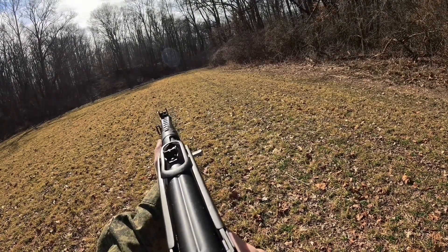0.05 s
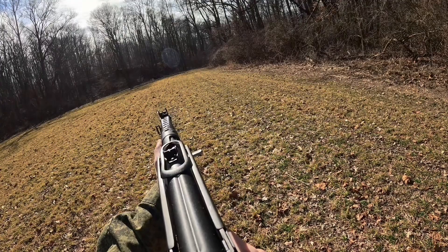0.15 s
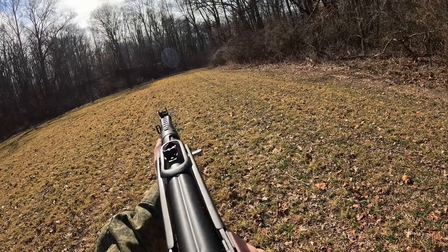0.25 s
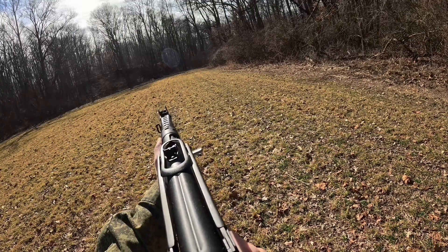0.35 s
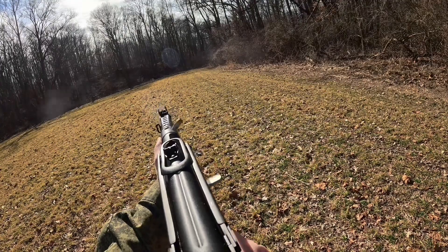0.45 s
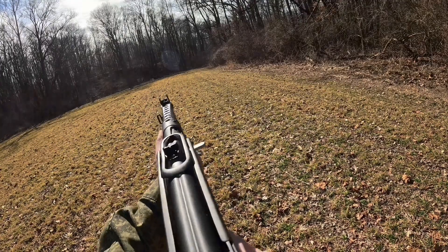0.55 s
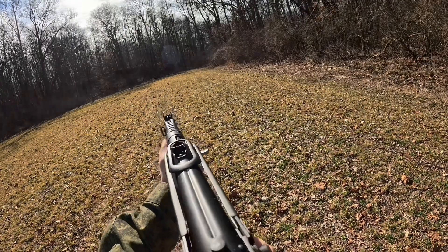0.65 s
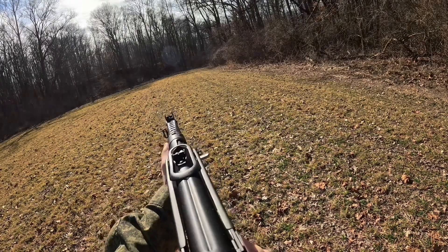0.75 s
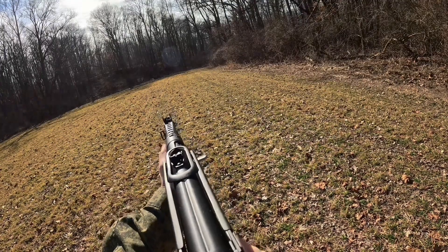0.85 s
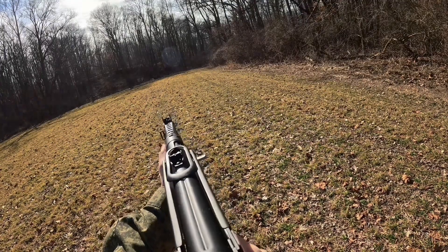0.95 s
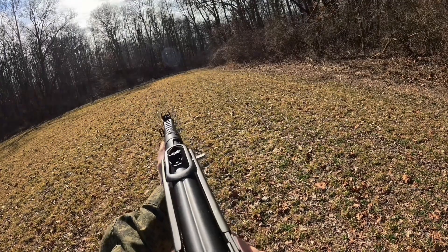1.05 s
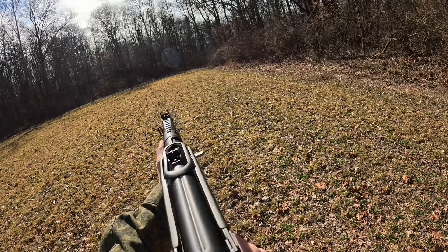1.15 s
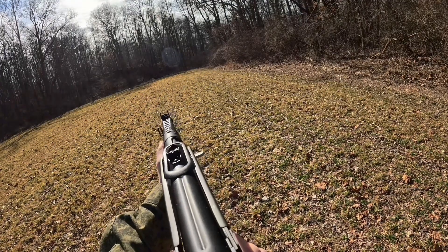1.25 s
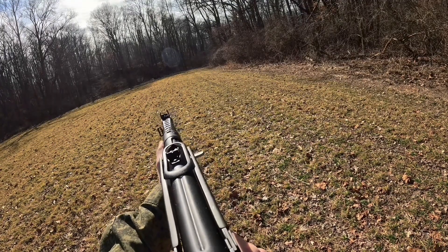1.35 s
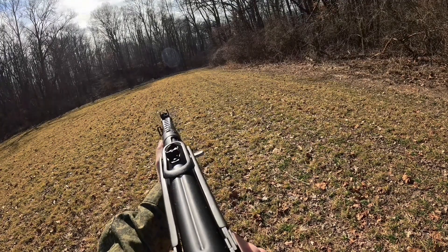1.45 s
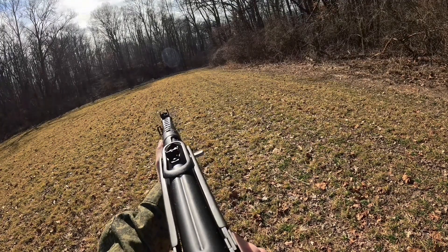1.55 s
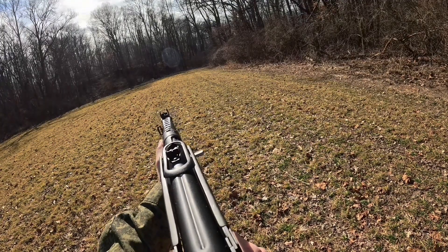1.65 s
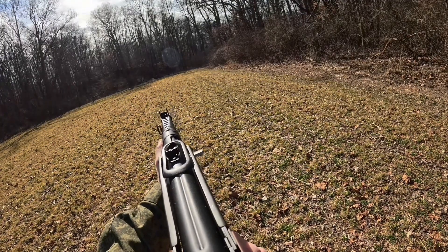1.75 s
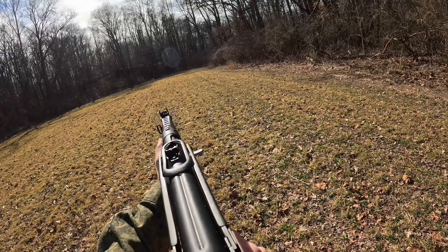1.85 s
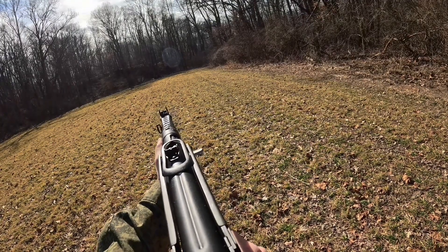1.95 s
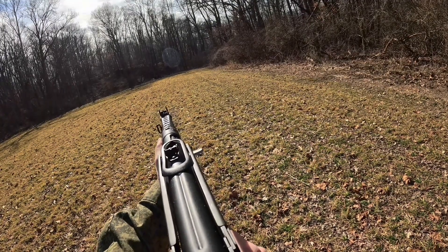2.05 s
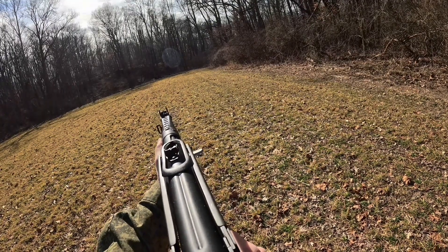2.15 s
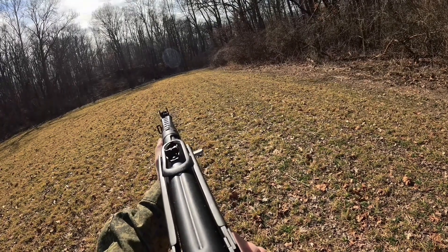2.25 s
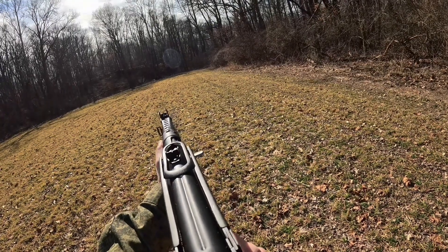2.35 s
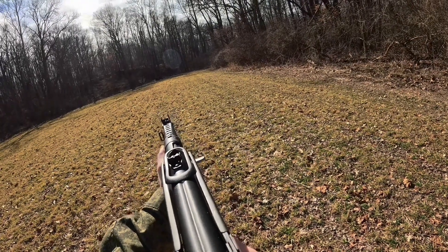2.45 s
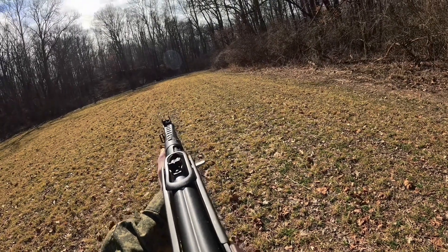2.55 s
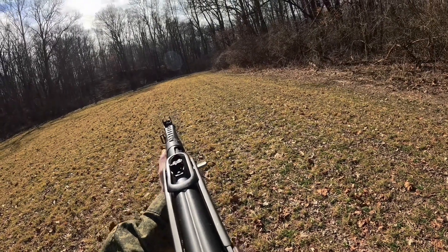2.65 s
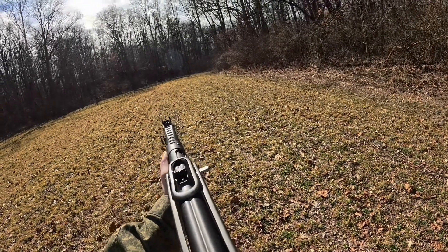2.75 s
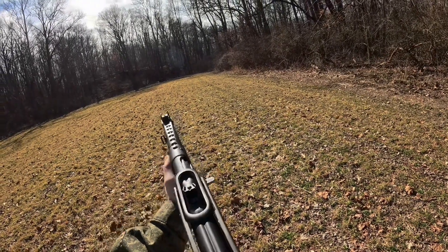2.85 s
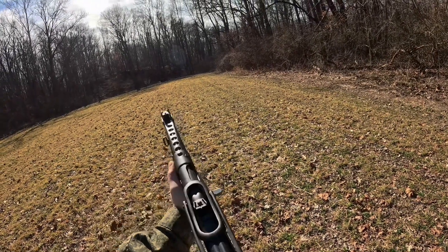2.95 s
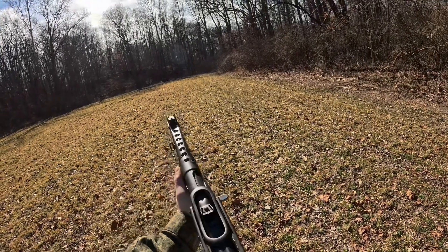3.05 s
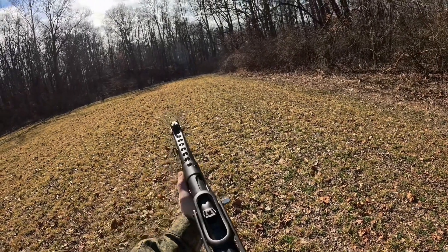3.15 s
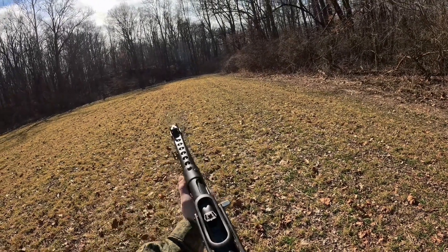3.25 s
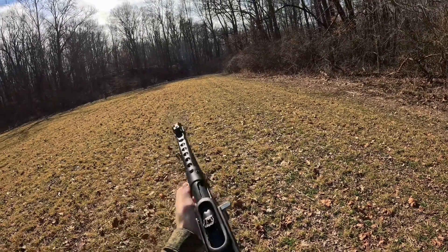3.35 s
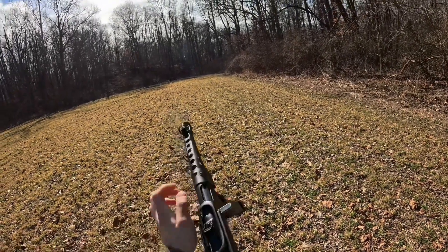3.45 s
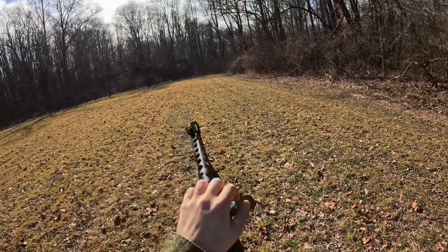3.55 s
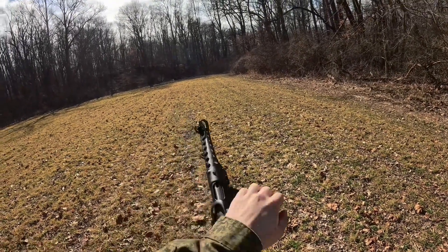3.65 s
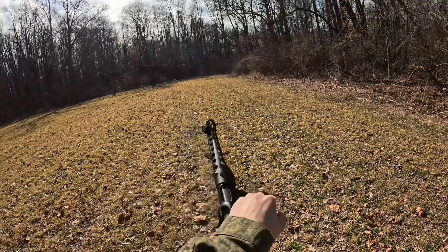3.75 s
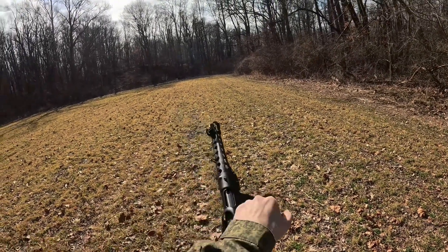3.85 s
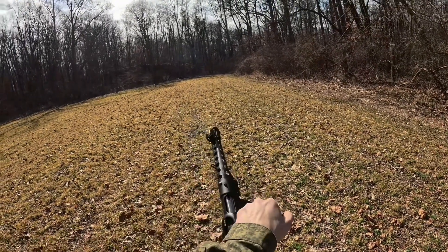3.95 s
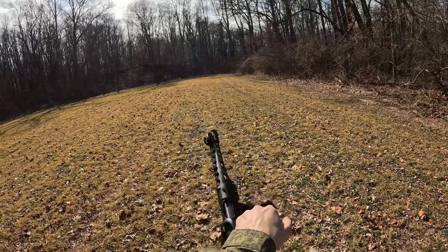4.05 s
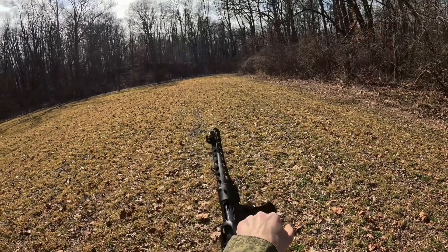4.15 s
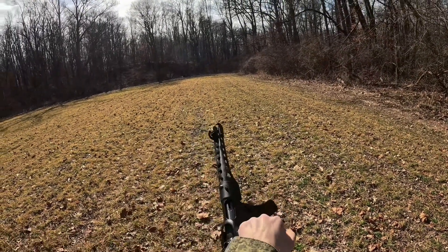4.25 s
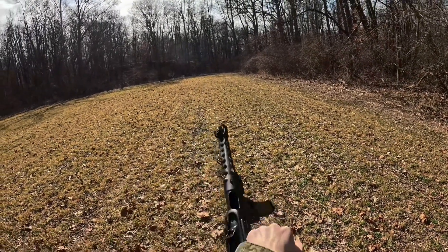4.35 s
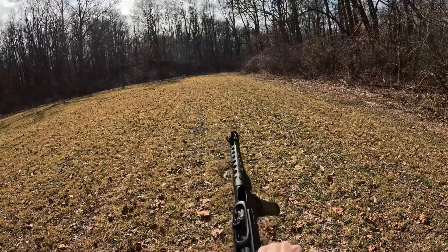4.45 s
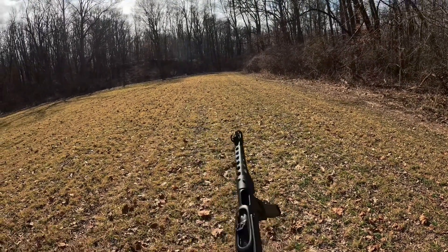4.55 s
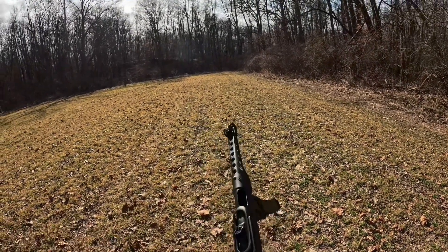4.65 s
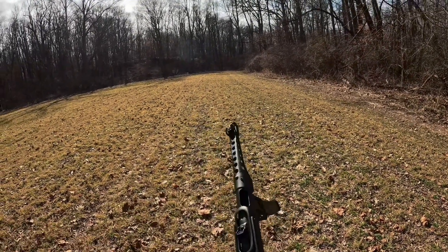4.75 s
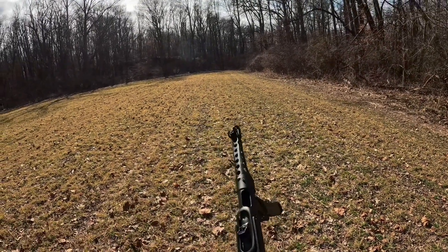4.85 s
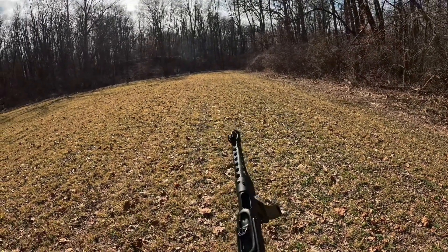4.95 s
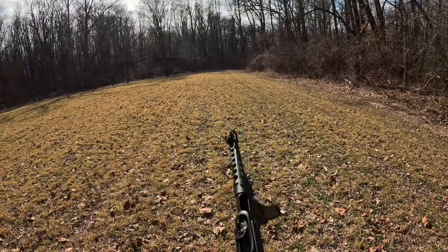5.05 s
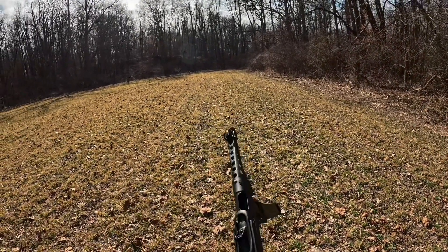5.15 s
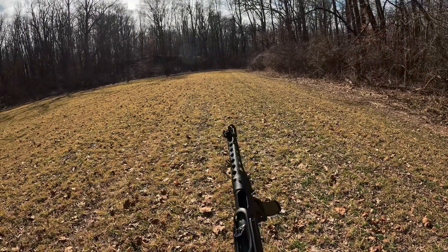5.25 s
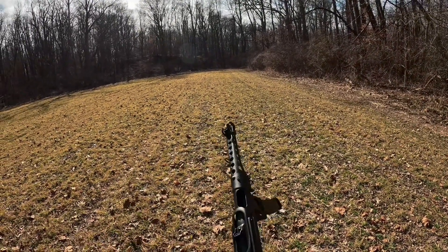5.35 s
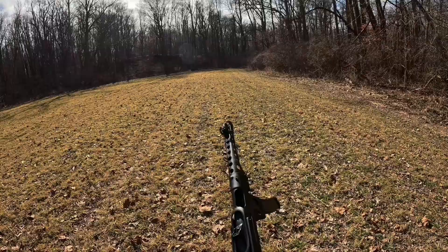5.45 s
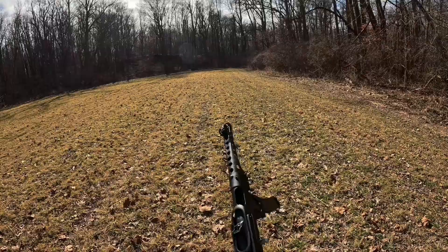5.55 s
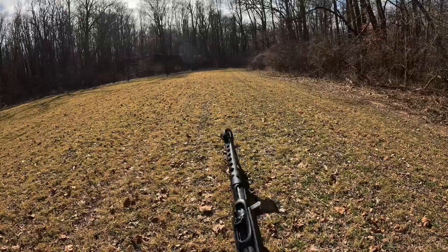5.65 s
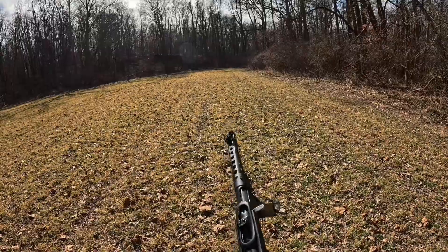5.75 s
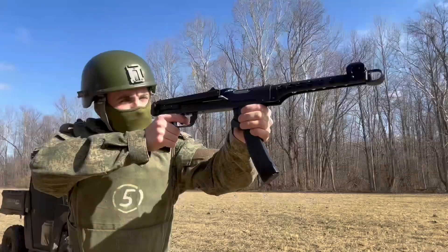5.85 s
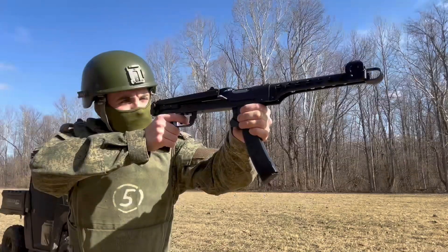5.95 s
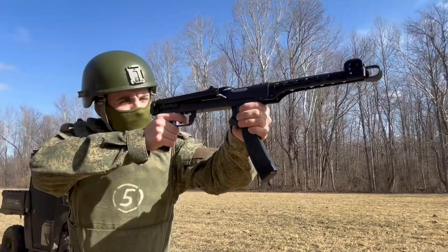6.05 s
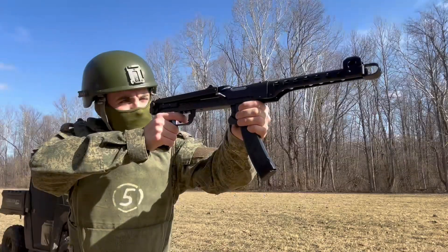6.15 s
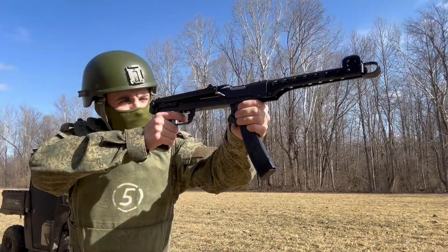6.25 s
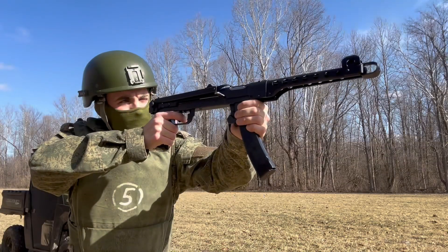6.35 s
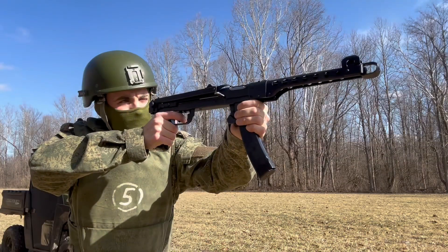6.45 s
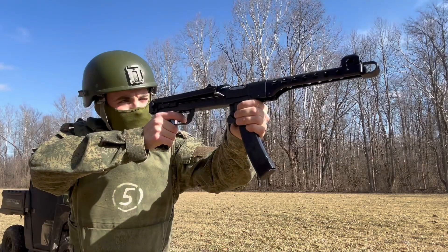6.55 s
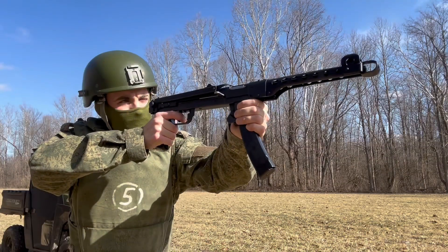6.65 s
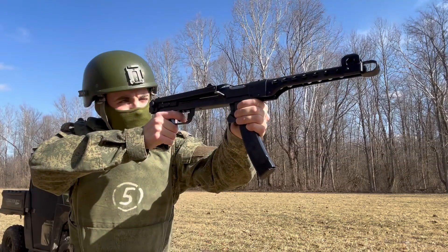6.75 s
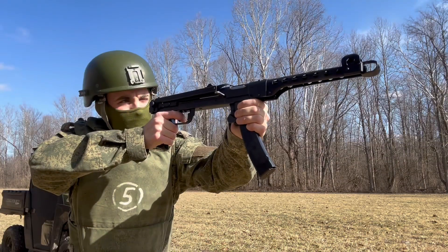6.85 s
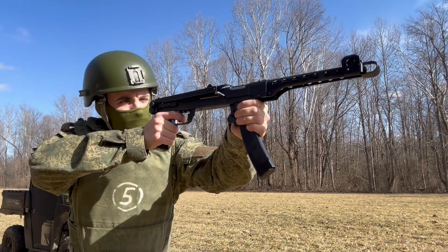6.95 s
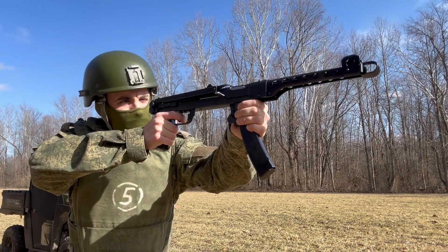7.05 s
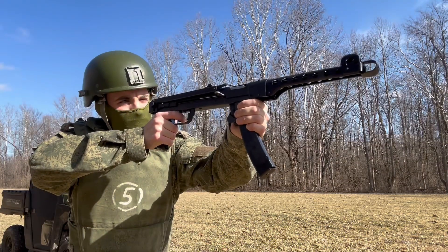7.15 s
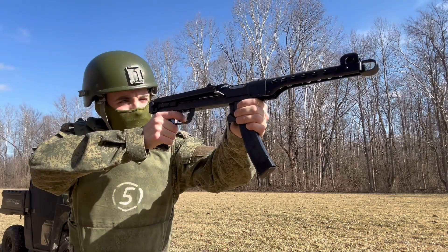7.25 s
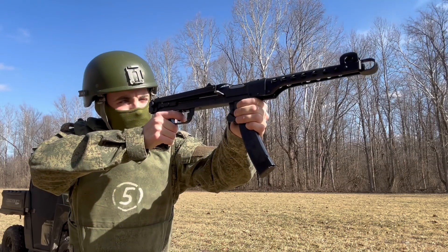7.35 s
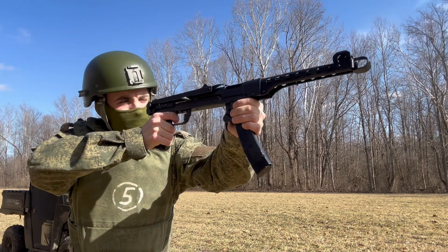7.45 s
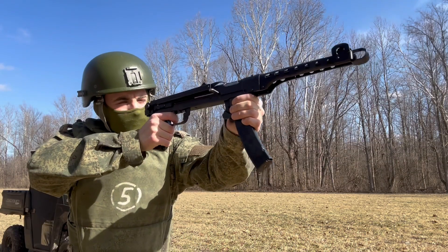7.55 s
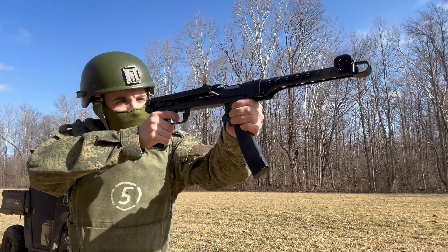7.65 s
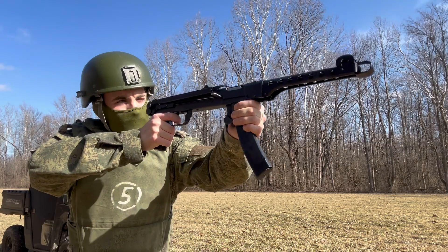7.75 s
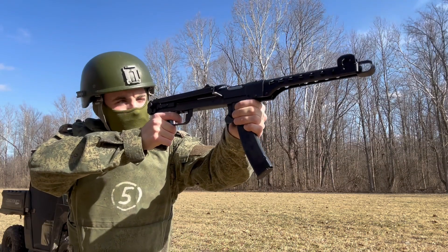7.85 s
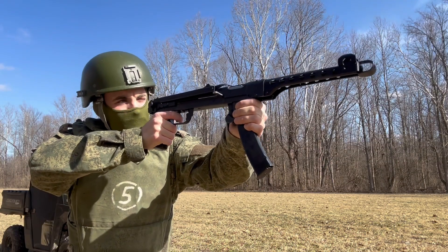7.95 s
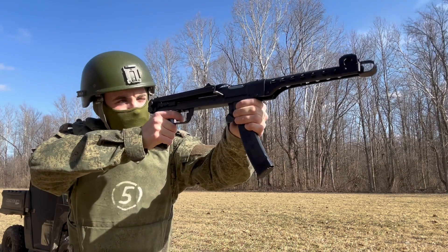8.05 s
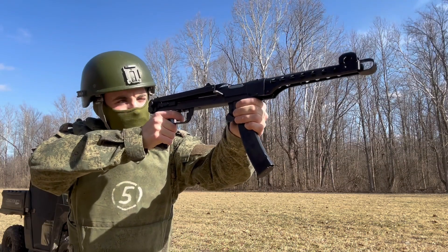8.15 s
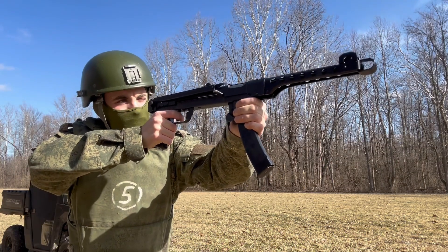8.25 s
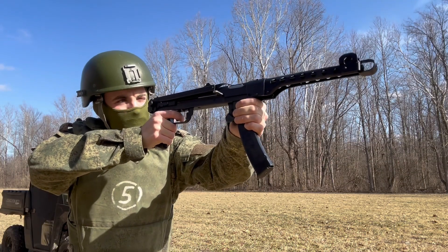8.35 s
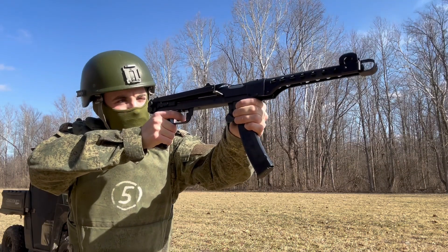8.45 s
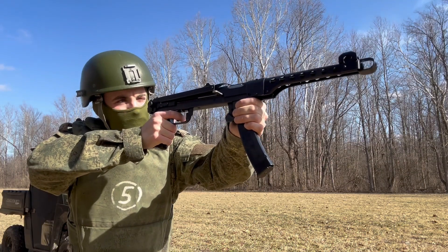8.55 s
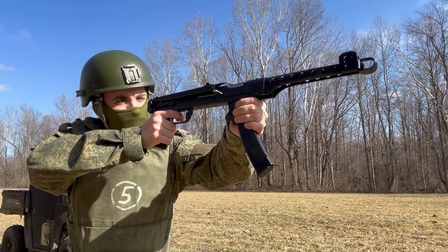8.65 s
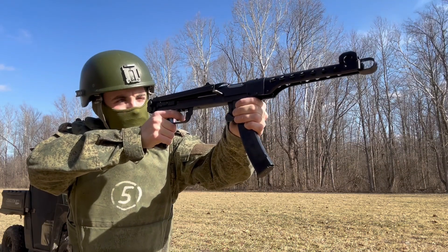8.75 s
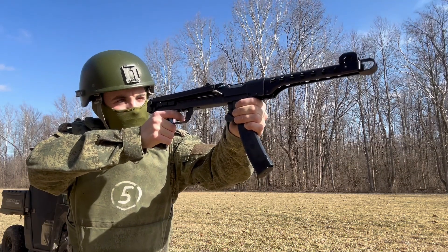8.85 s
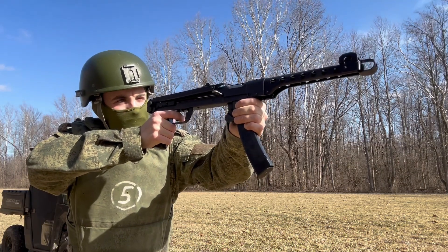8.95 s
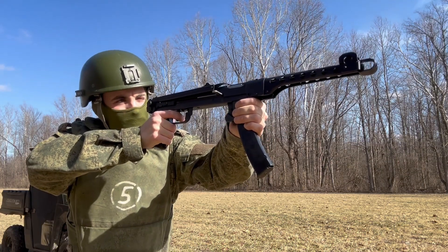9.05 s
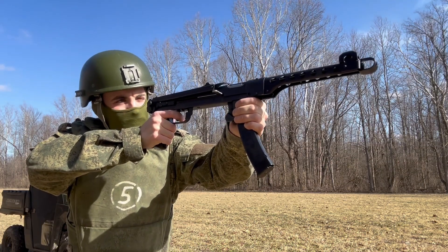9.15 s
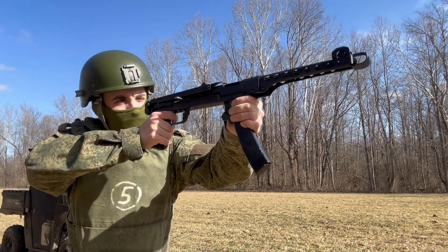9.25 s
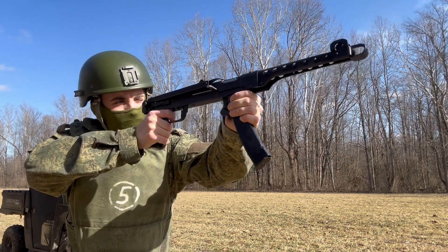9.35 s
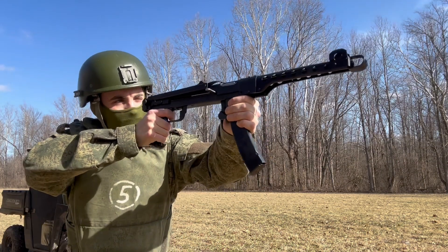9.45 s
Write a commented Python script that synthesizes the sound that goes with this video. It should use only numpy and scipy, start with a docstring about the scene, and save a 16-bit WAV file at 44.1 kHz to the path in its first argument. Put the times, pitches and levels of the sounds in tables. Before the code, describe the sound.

Three single submachine gun shots echo through woods, with metallic trigger clicks, a bolt pulled and released, and light wind.

```python
"""Gunshots in a wooded field

Single shots of a submachine gun are heard at the shooter's head (mono), then from a wide stereo pair
at his side. A short, clanging rush of noise swells just before each crack and boom; bare woods scatter
the report back. Trigger and bolt excite the steel receiver by impact and the rails by friction.
Cloth rustles, wind buffets the microphones and a far bird calls."""
import sys
import numpy as np
from scipy import signal
from scipy.fft import rfft, irfft, next_fast_len
from scipy.io import wavfile
from scipy.ndimage import uniform_filter1d, map_coordinates

SR = 44100
rng = np.random.default_rng(int(sys.argv[2]) if len(sys.argv) > 2 else 0)


def transcribe(signal):
    """Save signal, clipped to [-1, 1], as a 16-bit WAV file at the path in sys.argv[1]."""
    frames = np.atleast_2d(signal).T
    limited = np.clip(frames, -1, 1)
    pcm = np.round(limited * 32767).astype(np.int16)
    wavfile.write(sys.argv[1], SR, pcm)


N = 419371
MOVE_S = 5.828  # the listening place moves from HEAD to SIDE

# (crack time [s], rush length [s], rush exponent, rush [dB], crack [dB], boom [dB], boom pitch [Hz],
#  near echo [dB], near echo t60 [s], woods echo [dB])
SHOTS = [(0.54, .041, 1.12, -13, -14, -12.5, 161.2, -21, 0.21, 0),
         (7.4055, .019, 0.3, -16.5, -10, -27, 235.5, -24.5, 0.47, 0),
         (9.2, 0.023, 1.5, -14.5, -8, -17.5, 248.2, -22, 0.31, 3)]
# spectra of the rush, near echo, woods echo and low roll: (frequency [Hz], density [dB])
RUSH_HEAD = [(180, -38), (300, -6), (397, -16), (835, -6), (1090, -24), (1350, -4), (1780, -7.5),
             (2650, -9), (4210, -18), (5760, -16), (6680, -27.5), (10100, -29.5), (15500, -63.5)]
RUSH_SIDE = [(180, -31), (300, -1.5), (620, 7.5), (1120, -23), (1490, -8), (2480, 4), (2930, -8.5),
             (3510, -2.5), (4000, -4.5), (5210, -11), (6050, -1.5), (6790, -35), (7620, -9.5), (8420, -31),
             (15500, -53)]
NEAR_HEAD = [(59, -40), (100, -10), (248, -2), (758, -12.5), (1290, -5.5), (4370, -14.5), (10400, -28.5),
             (14200, -45.5), (15500, -77.5)]
NEAR_SIDE = [(59, -35.5), (100, -6), (758, -1.5), (861, -7.5), (1400, -8), (1690, -5), (2040, -7),
             (10400, -18), (15500, -31.5)]
WOODS_HEAD = [(210, -36), (350, -12), (591, 1.5), (761, 2.5), (1510, 0), (2350, -1), (3380, -4.5),
              (7240, -20.5), (8900, -31.5), (15500, -67.5)]
WOODS_SIDE = [(210, -37.5), (350, -6), (671, -2.5), (1260, -6), (2100, -3), (3030, -5), (4500, -14),
              (9630, -25), (11700, -33), (13700, -63), (15500, -83)]
ROLL = [(60, -18), (110, -2.5), (170, 0.5), (300, -1.5), (450, -11), (700, -47)]
# envelope of the woods echo: (time after the crack [s], scatter [dB], low roll [dB])
ECHO_HEAD = [(.03, -30, -21), (.13, -23, -12), (.21, -24, -19), (.27, -15, -15), (.42, -16.5, -20),
             (.58, -16, -20), (.72, -19, -29), (1.3, -29, -39), (2.25, -37, -39), (2.9, -47, -37),
             (4.3, -56, -45)]
ECHO_SIDE = [(.04, -35, -38), (.13, -30, -30), (.3, -32, -34), (.6, -31.5, -39), (1.01, -26, -41.5),
             (1.2, -29.5, -41.5), (1.6, -35.5, -44), (1.8, -41.5, -43)]
# reflections off single trunks: (time [s], level [dB], centre [Hz])
SLAPS = [(0.7235, -33, 2860), (0.7847, -30, 2460), (0.9178, -15.5, 2250), (0.9587, -19.5, 3300),
         (1.0874, -18.5, 1900), (7.7468, -33.5, 2320), (7.776, -28, 2160), (7.8173, -28.5, 2370),
         (7.9484, -31, 1970), (7.9724, -27.5, 1970)]

# modes of the sheet steel receiver: (frequency [Hz], level [dB], t60 [s])
STEEL_MODES = [(1208.5, 11.5, 0.02), (1559, 6, .03), (1784, 1, 0.024), (2370, -3, 0.015),
               (2720, -7.5, 0.022), (3280, -10.5, 0.042), (3750, -8, 0.0083), (4490, -17.5, .025),
               (5200, -6, 0.0074), (5450, -9, 0.03), (6140, -10, 0.017), (7300, -5, 0.0067),
               (8560, -0.5, 0.024), (8960, -6, 0.035), (9500, 5, 0.0068), (10900, -6.5, 0.049),
               (12500, -18.5, .015)]
# clicks and cracks: (time [s], level [dB], knock [dB], ring time factor)
TRIGGER = [(0.2346, -22, -3.5, .95), (2.1197, -24, -.5, 1), (2.3452, -20, -2, 1.6), (8.3895, -23, -12, .7)]
# the rows at 0.5476 s and 9.2075 s are each a second sharp crack just after the shot
AFTER_SHOT = [(0.5476, -14.5, -10.5, 1.4), (0.5612, -19, -16, .85), (0.6098, -21, -15.5, 1.6),
              (7.435, -24.5, -13.5, 1.2), (7.4866, -23, -19.5, 1.1), (9.2075, -16, -9.5, .55),
              (9.2963, -23.5, -18.5, .85)]
HANDLING = [(3.37, -46, -11, 2.5), (3.525, -50, -5.5, 2.5), (3.924, -64, 12, 1.2), (4.039, -51, 3, 2.5),
            (4.17, -58, 0, 1.4), (4.6674, -54, -20, .5), (4.7235, -50, -8, 2.5), (4.749, -55, -8, 1.7),
            (5.569, -47, -3, 2), (5.594, -41, 5, .8), (5.809, -50, -13, 1.4), (6.152, -72, -.5, 1.1),
            (6.99, -70, -5, 1.1)]
PULLED = [(4.3936, -29, -26, .8), (4.429, -44, 4, 1), (4.4512, -30, -.5, .5), (4.459, -20, -8, .45),
          (4.4834, -42, 6.5, 1.6), (4.5045, -43, 1, 2.5), (4.5788, -30, -31, 1.5), (4.585, -40, 17, .5),
          (4.6047, -26.5, -21, 1.2)]
RELEASED = [(5.635, -31, -5, .6), (5.6564, -20.5, -1.5, .5), (5.6862, -9.5, -26, .6)]
# timbre of each group: (clicks, brightness [dB], thump [dB])
CLICK_GROUPS = [(TRIGGER, -14, -18), (AFTER_SHOT, -21, 3), (HANDLING, -29, 8),
                (PULLED, -29, -14), (RELEASED, -11, 0)]
# trigger spring: (time [s], level [dB])
SPRING_PINGS = [(0.235, -41), (2.1202, -38)]
# bolt strokes: (start [s], stop [s], ring [dB], hiss [dB], rise [s per 20 dB], fall [s per 20 dB])
STROKES = [(4.405, 4.435, -40.5, -53, .04, .03), (4.455, 4.46, -24, -50, .02, .04),
           (4.49, 4.51, -33, -53, .03, .07), (4.585, 4.603, -33, -44, .04, .026),
           (5.648, 5.69, -22, -25, .022, .017), (5.72, 5.824, -59, -60, .03, .004)]
# rail resonances: (frequency [Hz], bandwidth [Hz], level [dB])
RAIL_MODES = [(720, 300, -14), (1225, 150, -1), (1532, 80, 3), (2150, 280, -9.5), (2950, 250, -13),
              (3430, 200, -12)]
# friction hiss: (frequency [Hz], density [dB])
RASP = [(1470, -16.5), (2500, -8), (4010, -6.5), (5080, -20), (8810, -20.5), (12100, -24.5), (15500, -54)]
# cloth rustles: (start [s], stop [s], level [dB], rise [s per 20 dB], fall [s per 20 dB])
SLEEVE = (3.36, 4.68, -72.5, .25, .3)
THIN_RUSTLE = (6.5, 6.54, -74.5, .04, .07)

# spectra of buffeting and open air: (frequency [Hz], density [dB])
BUFFET = [(12, -34), (20, 0), (77, 2.5), (211, -17.5), (362, -22), (425, -33), (461, -28.5), (500, -24),
          (650, -46.5), (1100, -120)]
AIR_HEAD = [(71, -33.5), (120, -13.5), (221, -19.5), (300, -20), (423, -35), (936, -39.5), (1300, -34.5),
            (2160, -47), (7450, -59), (15500, -93)]
AIR_SIDE = [(71, -32), (120, -7.5), (478, -17.5), (1060, -30.5), (1120, -32), (1460, -29.5), (1560, -37),
            (2540, -36), (3660, -44.5), (9910, -58.5), (15500, -74.5)]
# their envelopes, for buffeting one list per listening place: (time [s], level [dB])
BUFFET_LEVELS = [
    [(0, -32), (.1, -41), (.3, -49), (.65, -44), (.8, -54), (1.13, -40), (1.46, -56), (1.82, -54),
     (2.1, -41), (2.8, -48), (3.4, -38), (3.65, -45), (4.5, -42), (4.68, -36), (4.9, -42), (5.15, -37),
     (5.44, -41), (5.6, -33), (5.8, -38)],
    [(5.87, -43.5), (6, -47), (6.5, -43), (7.1, -43), (7.27, -36), (7.44, -44), (7.62, -57), (7.9, -67),
     (8.28, -59), (8.47, -50), (9.04, -50), (9.22, -62), (9.51, -64)],
]
AIR_LEVELS = [(0, -63.5), (4.7, -57), (5.6, -53), (5.72, -70.5), (5.81, -75.5), (5.83, -51.5), (7.3, -52.5),
              (7.5, -63), (9.15, -64), (9.51, -70.5)]
# whistles: (time [s], starting pitch [Hz], half the relative rate of fall [1/s], level [dB])
BIRD_NOTES = [(6.57, 3030, 1.1, -68.5), (6.66, 2660, 0.62, -63.5), (6.87, 2760, 2.2, -61.5),
              (6.93, 2600, .5, -61.5), (7.118, 2620, 1.35, -60), (7.17, 2700, 0.91, -61)]
# stereo difference relative to mid: (frequency [Hz], gain [dB])
WIDTH_SPECTRUM = [(60, -6), (110, -4), (200, -8), (380, -3), (700, 5.5), (1290, 2), (2380, -1.5),
                  (4400, 1.5), (8120, -4.5), (15000, 1.5)]
# stereo image: (time [s], added difference gain [dB], leftward lean [-1..1])
IMAGE = [(0, -70, 0), (4.55, -68.5, 0), (4.65, -17, -.06), (5.82, -8, -.07), (5.83, 1, -.02),
         (9.51, 0, -.02)]


def shots():
    """Blast wave: a crack and boom, reflected at once by ground and near trunks."""
    out = np.zeros((2, N))
    hz = np.transpose(STEEL_MODES)[0][:, None]
    crack_spectrum = [(500, 1.5), (2000, -8), (9000, -8.5), (15000, -23.5)]
    for s, rush_s, power, rush_db, crack_db, boom_db, boom_hz, near_db, near_t60, _ in SHOTS:
        t = np.arange(SR // 2) / SR - rush_s
        rise, after = np.clip(1 + t / rush_s, 0, 1), np.maximum(t, 0)
        colour, near, width = (RUSH_HEAD, NEAR_HEAD, .01) if s < MOVE_S else (RUSH_SIDE, NEAR_SIDE, .9)
        # a short, clanging rush of noise swells just before the crack and boom
        clang = partials(hz, along(colour, hz) + rng.normal(0, 3, (2, len(hz), 1)), t)
        rush = noise(colour, len(t)) + .8 * unit(clang)
        x = decay(rush_db, after, t60=.014) * rise ** power * rush
        x += decay(crack_db, after, t60=.0074) * (t > 0) * noise(crack_spectrum, len(t))
        u = after / .0034
        x += amp(crack_db - 5) * (t > 0) * (1 - u) * np.exp(-u)  # overpressure, then suction
        boom = partials(boom_hz * np.array([[.6], [1], [1.65]]), [[-5], [0], [-3]], t)
        x += decay(boom_db, np.maximum(t - .008, 0), t60=.041) * rise ** 2 * boom
        x += decay(near_db, after, near_t60) * (t > 0) * noise(near, len(t))
        add(out, s - rush_s, x * [[1], [width]])
    return out


def woods():
    """Scattering and air absorption: later echoes from the trees travel farther and lose more treble."""
    hz, t, spectra = signal.stft(rng.standard_normal((2, N)), SR, nperseg=512)
    hz = hz[:, None]
    gain = np.zeros(spectra.shape[1:])
    treble_khz = np.maximum(hz / 1000 - 1.2, 0)
    for s, *_, db in [(-1.05, -1)] + SHOTS:  # a shot fired before the start still echoes
        echo, colour, loss_from_s = (
            (ECHO_HEAD, WOODS_HEAD, .3) if s < MOVE_S else (ECHO_SIDE, WOODS_SIDE, .45))
        scatter_db, roll_db = curves(echo, t - s)
        db_per_khz = np.clip(5.5 * (t - s - loss_from_s), 0, 10.5)
        scatter = amp(scatter_db + along(colour, hz) - db_per_khz * treble_khz - .051 * treble_khz ** 2)
        roll = amp(roll_db + along(ROLL, hz))
        gain = np.hypot(gain, amp(db) * (scatter + roll))  # echoes add in power
    flicker = uniform_filter1d(rng.standard_normal(gain.shape), size=9, axis=0)
    flicker = uniform_filter1d(flicker, size=4, axis=1)
    return signal.istft(spectra * gain * amp(1.4 * unit(flicker)), SR, nperseg=512)[1][:, :N]


def trunk_slaps():
    """Discrete reflection: single trunks each return a short band of noise."""
    out, t = np.zeros((2, N)), np.arange(1300) / SR
    attack = 1 - np.exp(-t / .0005)
    for s, db, centre_hz in SLAPS:
        band = [(centre_hz / 1.6, -26), (centre_hz, 0), (centre_hz * 1.4, -12), (9000, -45), (15000, -80)]
        add(out, s, decay(db, t, t60=.059) * attack * noise(band, len(t)))
    return out


def clicks():
    """Damped modes, noise and a thump form the mechanism's clicks and two shots' second cracks."""
    out, t = np.zeros((2, N)), np.arange(SR // 4) / SR - .02
    after, ring_t = np.maximum(t, 0), t[:SR // 10]
    hz, mode_db, t60 = np.transpose(STEEL_MODES)[:, :, None]
    events = [(*row, *timbre) for rows, *timbre in CLICK_GROUPS for row in rows]
    for s, db, knock_db, ring, bright_db, thump_db in events:
        if s > MOVE_S:  # brighter and thinner from the side
            bright_db, thump_db = bright_db + 15, thump_db - 15
        tone = [(500, knock_db - 17), (1200, knock_db), (2500, 0), (4500, -3),
                (8000, bright_db), (11000, bright_db - 3), (15500, bright_db - 29)]
        drift = np.cumsum(rng.standard_normal((2, len(hz), len(ring_t))), axis=2)
        blur = .039 * (hz / 1000 - 1) ** .5 * drift  # loose parts smear the upper modes
        onset_db = mode_db + rng.normal(0, 1.9, (2, len(hz), 1)) + along(tone, hz)
        modes = decay(onset_db, np.maximum(ring_t, 0), t60 * ring) * sine(hz, ring_t, blur)
        click = 2.4 * decay(0, after, t60=.026 * ring)
        tail = decay(-16, after, t60=.11) + decay(-29, after, t60=.45)
        x = coloured((click + tail) * rng.standard_normal((2, len(t))), tone)
        x[:, :len(ring_t)] += modes.sum(axis=1)
        x *= amp(db) * np.exp(np.minimum(t, 0) / .0014)  # rapid attack
        x[0] += decay(db + thump_db, after, t60=.03) * sine(190, after)
        x[1] *= 0 if s < IMAGE[1][0] else .2 if s < MOVE_S else .6  # stereo width
        add(out, s + t[0], x * ((s > MOVE_S) | (s + t < MOVE_S)))
    return out


def spring():
    """Free vibration: a spring sings on after the trigger resets."""
    out, t = np.zeros((2, N)), np.arange(round(.23 * SR)) / SR
    for s, db in SPRING_PINGS:
        add(out[:1], s, decay(db, t[None], t60=.13) * sine(4020, t))
    return out


def bolt():
    """Friction: uneven scraping drives the rails' resonances and a gritty hiss."""
    def rails(f):
        return sum((-1) ** k * amp(db) * 1j * f * width / (hz * hz - f * f + 1j * f * width)
                   for k, (hz, width, db) in enumerate(RAIL_MODES))

    grit = rng.standard_normal((2, N)) * amp(2.2 * wobble(90) + 2 * wobble(500))
    ring_gain, hiss_gain = sum(hump(start, stop, rise, fall) * amp([[ring_db], [hiss_db]])
                               for start, stop, ring_db, hiss_db, rise, fall in STROKES)
    return ring_gain * unit(filtered(grit, rails)) + hiss_gain * unit(coloured(grit, RASP))


def sleeve():
    """Friction noise: cloth brushes near the microphone in small clumps."""
    cloth = noise([(800, -21), (1500, 2.5), (4000, -5.5), (10000, -22.5), (15000, -51.5)])
    thin = noise([(3000, -30.5), (6000, -4.5), (9000, .5), (12000, -5.5), (15000, -35)])
    clumps = amp(3.2 * wobble(30) + 2.9 * wobble(300))
    return clumps * sum(amp(db) * hump(start, stop, rise, fall) * x
                        for (start, stop, db, rise, fall), x in ((SLEEVE, cloth), (THIN_RUSTLE, thin)))


def wind():
    """Turbulence: fluctuating pressure buffets the microphone ports over the steady air of the field."""
    t = np.arange(N) / SR
    lumps = amp(3 * np.array([wobble(9), wobble(9)]))
    air = np.where(t < MOVE_S, noise(AIR_HEAD), noise(AIR_SIDE))
    buffet = unit(lumps * noise(BUFFET))
    buffet_db = curves(BUFFET_LEVELS[0] + BUFFET_LEVELS[1], t)[0]
    air_db = curves(AIR_LEVELS, t)[0] + .4 * wobble(4.1)
    return amp(buffet_db) * buffet + amp(air_db) * air


def bird():
    """Frequency glide: short whistles fall in pitch, their phase blurred by distance."""
    out, t = np.zeros((2, N)), np.arange(1800) / SR
    for s, start_hz, fall, db in BIRD_NOTES:
        blur = .13 * np.cumsum(rng.standard_normal((2, len(t))), axis=1)
        add(out, s, amp(db) * sine(start_hz, t - fall * t * t, blur) * np.sin(np.pi * t / t[-1]))
    return out


def amp(db):
    """Decibels to amplitude."""
    return 10 ** (np.asarray(db) / 20)


def unit(x):
    """Normalisation to rms 1."""
    return x / np.sqrt(np.mean(x ** 2) + 1e-20)


def decay(db, t, t60):
    """Exponential damping: 60 dB down in t60 seconds."""
    return amp(db - 60 * t / t60)


def sine(hz, t, phase=0):
    """Simple harmonic motion."""
    return np.sin(2 * np.pi * hz * t + phase)


def partials(hz, db, t):
    """Superposition of sines in random phase, mid and side."""
    return (amp(db) * sine(hz, t, rng.uniform(0, 2 * np.pi, (2, len(hz), 1)))).sum(axis=1)


def hump(start, stop, rise, fall):
    """Exponential rise to 1, hold and decay."""
    t = np.arange(N) / SR
    return amp(-20 * (np.maximum(start - t, 0) / rise + np.maximum(t - stop, 0) / fall))


def along(points, hz):
    """Interpolation on a log frequency axis."""
    f, db = np.transpose(points)
    return np.interp(np.log(hz + 1), np.log(f + 1), db)


def curves(rows, t):
    """Interpolation of each column in time; -140 outside the table."""
    times, *columns = np.transpose(rows)
    return [np.interp(t, times, column, -140, -140) for column in columns]


def filtered(x, response):
    """Linear filtering by a frequency response."""
    size = next_fast_len(x.shape[-1] + 2048)
    return irfft(rfft(x, size) * response(np.fft.rfftfreq(size, 1 / SR)), size)[..., :x.shape[-1]]


def coloured(x, spectrum):
    """Spectral shaping by (frequency [Hz], gain [dB]) points."""
    return filtered(x, lambda hz: amp(along(spectrum, hz)))


def noise(spectrum, count=N):
    """Coloured noise, mid and side, rms 1."""
    return unit(coloured(rng.standard_normal((2, count)), spectrum))


def wobble(rate):
    """Smooth random modulation, rate knots a second."""
    return map_coordinates(rng.standard_normal(int(N * rate / SR) + 4), [np.arange(N) * rate / SR])


def add(out, s, x):
    """Superposition of x on out from time s."""
    k = round(s * SR)
    out[:, k:k + x.shape[1]] += x[:, :N - k]


def scene():
    """Mid-side stereo: the sources add, and sum and difference give left and right."""
    mid, side = woods() + trunk_slaps() + bolt() + sleeve() + wind() + bird()
    width_db, lean = curves(IMAGE, np.arange(N) / SR)
    side = coloured(side, WIDTH_SPECTRUM) * amp(width_db)
    mid, side = shots() + clicks() + spring() + [mid, side]
    side = side + np.clip(lean, -1, 1) * mid
    return np.array([mid + side, mid - side])


def record(dry):
    """Saturation and band limiting: peaks round off at full scale; nothing passes above 15730 Hz."""
    soft = dry / (1 + np.abs(dry) ** 6) ** (1 / 6)
    return filtered(soft, lambda hz: np.clip((15730 - hz) / 300, 0, 1) ** 2)


dry = scene()
out = record(dry)
transcribe(out)
```